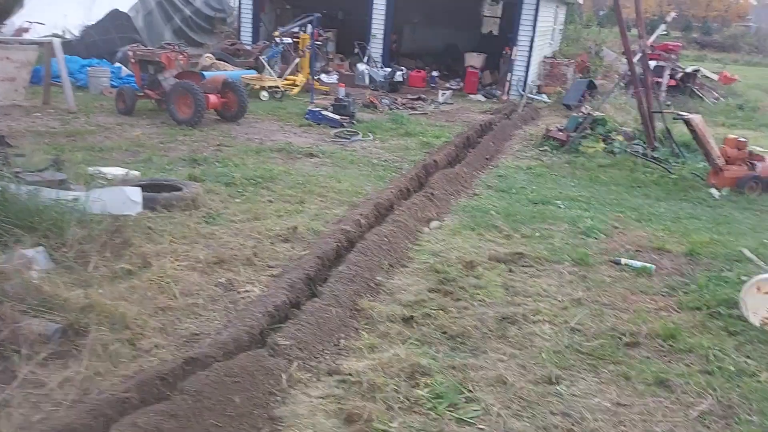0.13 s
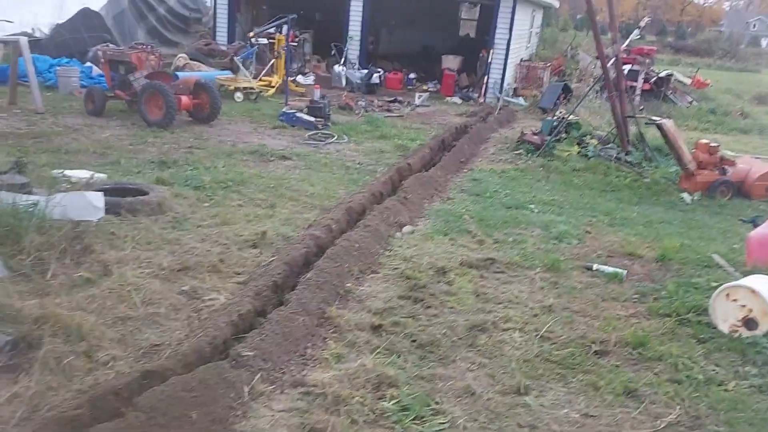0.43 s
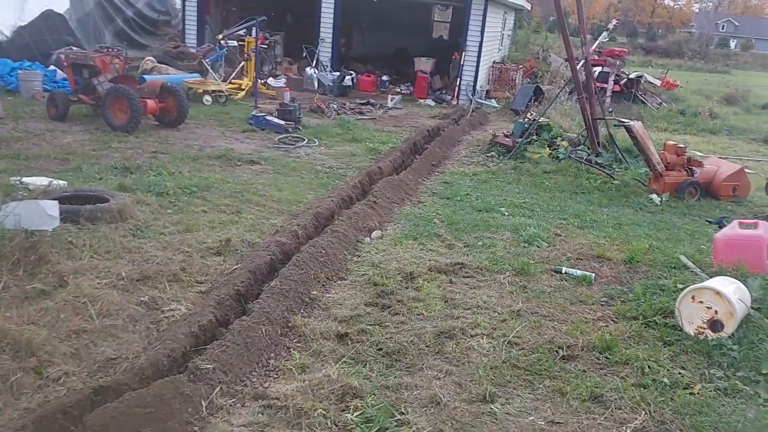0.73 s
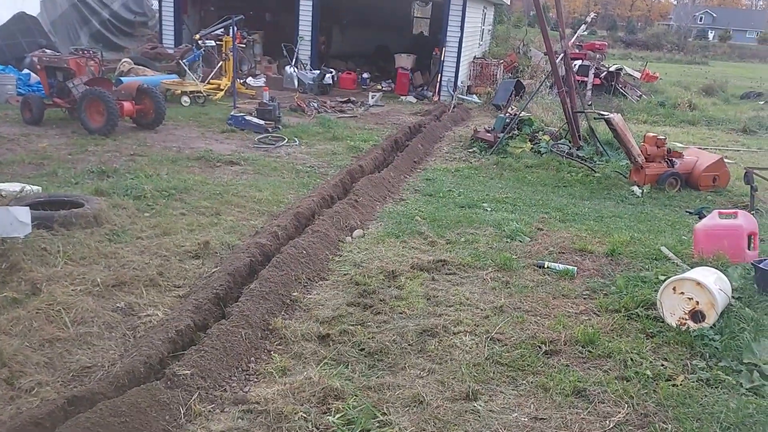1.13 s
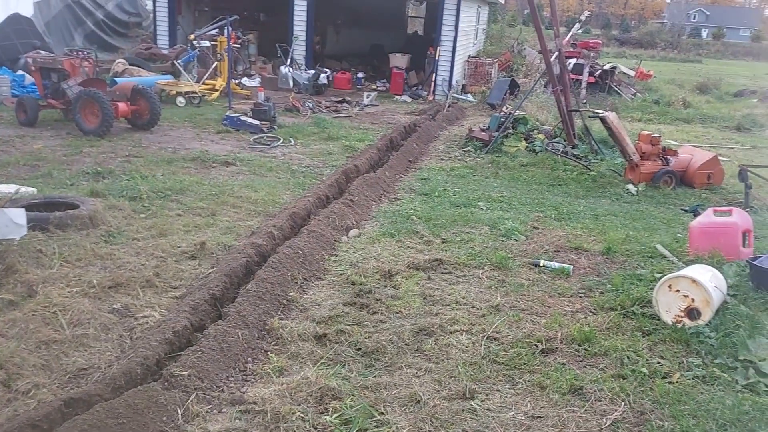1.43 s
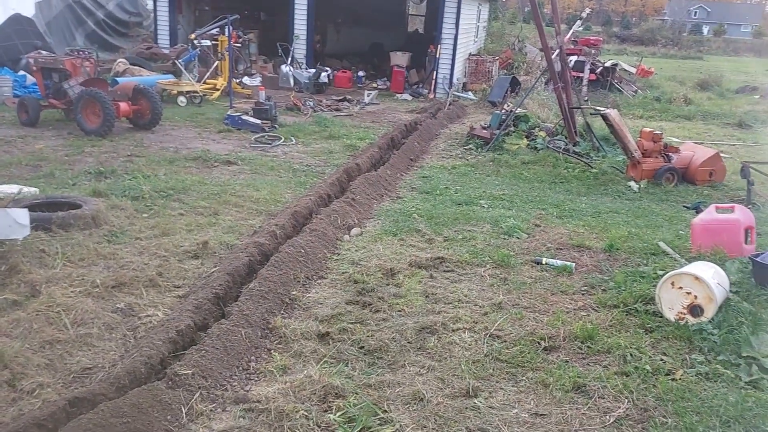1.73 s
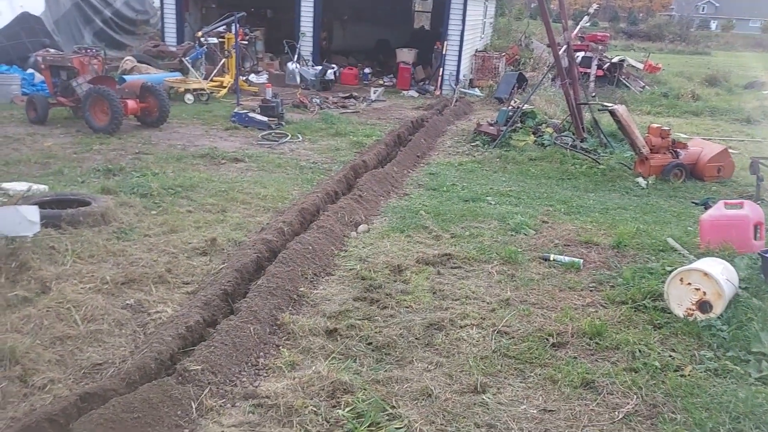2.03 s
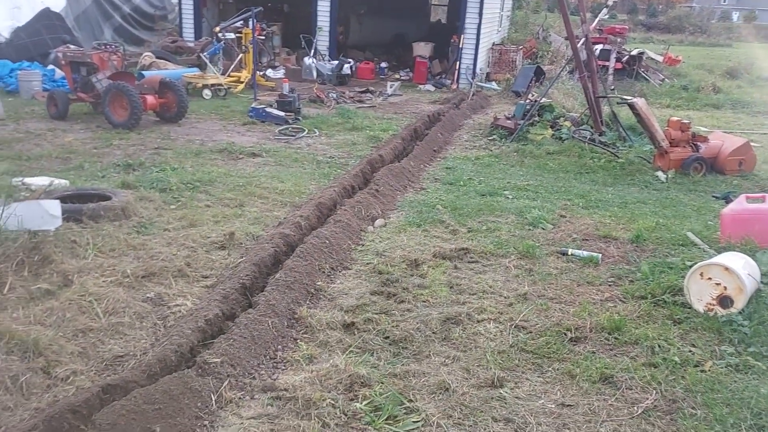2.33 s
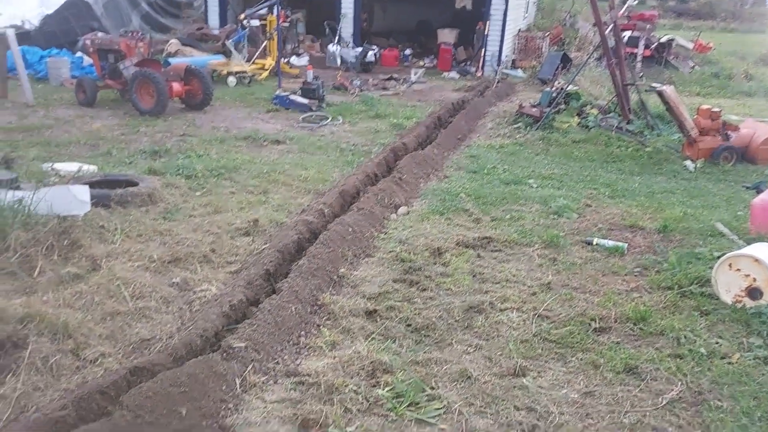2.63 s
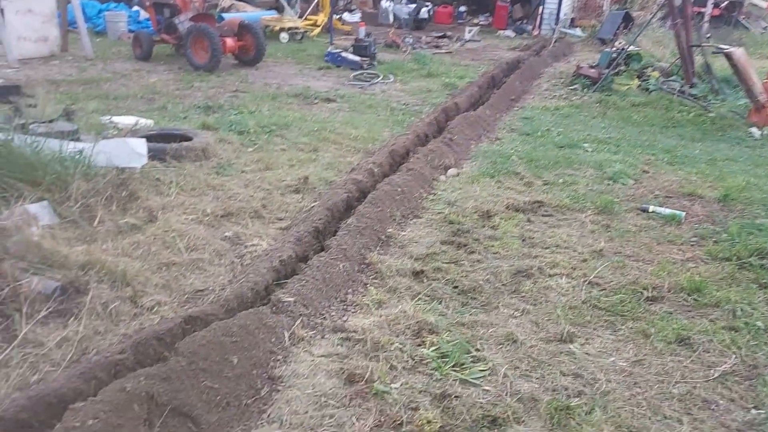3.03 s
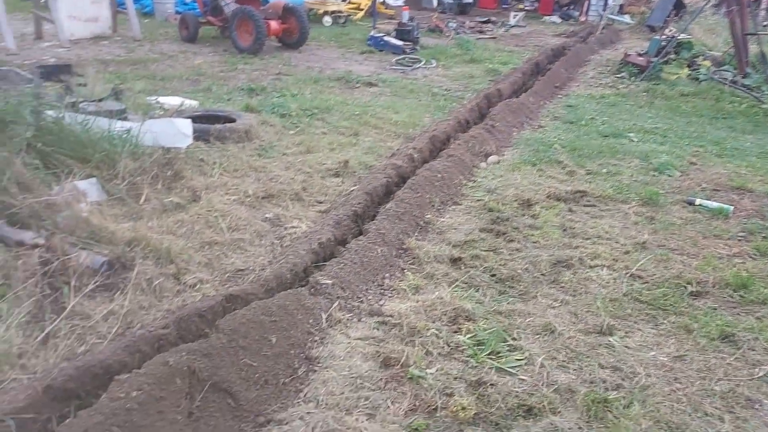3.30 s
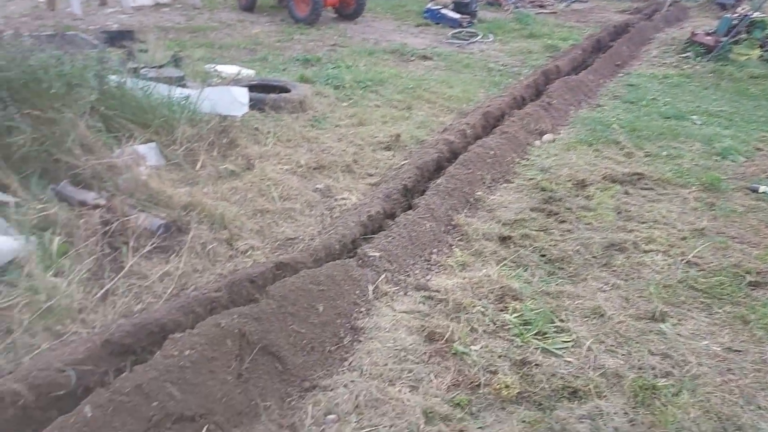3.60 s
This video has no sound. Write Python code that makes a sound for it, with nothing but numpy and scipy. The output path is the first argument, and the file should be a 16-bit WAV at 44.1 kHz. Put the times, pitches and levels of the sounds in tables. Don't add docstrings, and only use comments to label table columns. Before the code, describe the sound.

Small four-stroke engine chugs at constant speed to the left outdoors, a fainter low engine throbbing behind.

```python
import sys
import numpy as np
from scipy import signal
from scipy.fft import rfft, irfft
from scipy.io import wavfile

SR = 44100
rng = np.random.default_rng(int(sys.argv[2]) if len(sys.argv) > 2 else 0)


def inscribe(sig):
    pcm = np.round(np.clip(np.atleast_2d(sig).T, -1, 1) * 32767)
    wavfile.write(sys.argv[1], SR, pcm.astype(np.int16))


def voltage_ratio(level):
    return 10 ** (np.asarray(level, float) / 20)


N = 165816


def rms_one(x):
    return x / np.sqrt(np.mean(x ** 2) + 1e-20)


def in_time(rows):
    t_s, *columns = np.transpose(rows)
    return [np.interp(np.arange(N) / SR, t_s, column) for column in columns]


def at_hz(points):
    grid_hz = np.maximum(np.arange(N // 2 + 1) * SR / N, 1)
    f_hz, value = np.array(points).T
    return np.interp(np.log(grid_hz), np.log(f_hz), value)


def drift(rate_hz):
    r = np.exp(-80 * np.pi * rate_hz / SR)
    noise = rng.standard_normal(N // 40 + 2002)
    slow = signal.lfilter([1], [1, -2 * r, r * r], noise)[2000:]
    return np.interp(np.arange(N) / 40, np.arange(len(slow)), rms_one(slow))


def chance_db(spread_db, shape):
    return spread_db * np.clip(rng.standard_normal(shape), -1.8, 1.8)


def clicks_at(t_s, size):
    out = np.zeros(N)
    i = np.round(np.ravel(t_s) * SR).astype(int)
    keep = (i >= 0) & (i < N)
    np.add.at(out, i[keep], np.ravel(size)[keep])
    return out


def ring(drive, f_hz, t60_s):
    r = voltage_ratio(-60 / (t60_s * SR))
    w = 2 * np.pi * f_hz / SR
    return signal.lfilter([0, np.sin(w)], [1, -2 * r * np.cos(w), r * r], drive + 1e-18)


def high_pass(x, order, f_hz):
    return signal.sosfilt(signal.butter(order, f_hz, "high", fs=SR, output="sos"), x)


# t/s, firings counted
CRANK_POSITION = [(-0.039, -3.0), (0.4498, 11.5), (0.7364, 20.0), (1.0234, 28.5), (1.3084, 37.0),
                  (1.5946, 45.5), (1.8815, 54.0), (2.1675, 62.5), (2.4536, 71.0), (2.7394, 79.5),
                  (3.0254, 88.0), (3.3114, 96.5), (3.9335, 115.0)]


def firings():
    t_s, count = np.transpose(CRANK_POSITION)
    return np.interp(np.arange(count[0], count[-1]), count, t_s)


# f/Hz, level/dB, t60/s
SILENCER_MODES = [(61, -38.7, .028), (140, -46.7, .021), (177, -69, .12), (300, -37.6, .015),
                  (370, -60, .077), (478, -57.6, .042)]
# f/Hz, level/dB, t60/s
TAILPIPE_MODES = [(123.8, -61.5, .12), (286.6, -60, 0.063), (370, -72, 0.076), (447, -65.5, 0.086)]


def exhaust(fire):
    puff_db, vary_db, puff_ms = 60.5, 0.3, 0.41
    puff_lead_ms, pipe_lead_ms = 5.56, 1.19
    puff_low_hz, outlet_hz = 62, 45
    size = -voltage_ratio(vary_db * rng.standard_normal(len(fire)))
    clicks = clicks_at(fire - puff_lead_ms / 1000, size)
    early = clicks_at(fire - (puff_lead_ms + pipe_lead_ms) / 1000, -size)

    r = np.exp(-1000 / (puff_ms * SR))
    puff = signal.lfilter([(1 - r) ** 3], np.poly([r, r, r]), clicks)
    sound = high_pass(puff, 2, puff_low_hz)
    for k, (f_hz, db, t60_s) in enumerate(SILENCER_MODES):
        sound = sound + (-1) ** k * voltage_ratio(db) * ring(clicks, f_hz, t60_s)
    for f_hz, db, t60_s in TAILPIPE_MODES:
        sound = sound + voltage_ratio(db) * ring(early, f_hz, t60_s)
    return voltage_ratio(puff_db) * high_pass(sound, 4, outlet_hz)


# t/ms after puff rebound, knock level/dB, tick level/dB, hiss swell level/dB
CONTACT_EVENTS = [
    (-6.5, -8.5, -10, -7.5),
    (-1.5, 0, -0.5, 7.5),
    (-1.5, -12.5, -13.5, -11),
    (3, -3.5, -3.5, -5.5),
    (5, -12, 1, 2.5),
    (7.5, -9, -3.5, -14),
    (12.5, -4, -10.5, 6),
    (14.5, -11.5, -6.5, 1),
    (16.5, -18, -9, -3.5),
    (21, -8, -7, -4),
]


def struck(fire, strength_db, modes, vary_db):
    t_ms, jitter_ms = np.array(CONTACT_EVENTS)[:, 0], 0.044
    shape = (len(fire), len(t_ms))
    t_s = fire[:, None] + (t_ms + jitter_ms * rng.standard_normal(shape)) / 1000
    shared_db = chance_db(vary_db, shape)
    sound = np.zeros(N)
    for k, (f_hz, db, t60_s) in enumerate(modes):
        size = voltage_ratio(strength_db + db + shared_db + chance_db(vary_db, shape))
        sound += (-1) ** k * ring(clicks_at(t_s, size), f_hz, t60_s)
    return sound


# f/Hz, level/dB, t60/s
BLOCK_MODES = [(535, -9, .05), (652, -6, .04), (776, -3, .05), (1030, -9, .025), (1190, -4, .05),
               (1310, -6, .03), (1670, -4, .025), (2150, -3, .025), (2520, -7, .015)]


def knocks(fire):
    return struck(fire, -3 + np.array(CONTACT_EVENTS)[:, 1], BLOCK_MODES, vary_db=2)


# f/Hz, level/dB, t60/s
COVER_MODES = [(4230, -2, 0.013), (5130, -6, 0.013), (6700, -4, 0.014), (9400, -4, .012), (10170, 2, 0.014),
               (12000, 5, 0.015), (12700, 0, 0.014)]


def ticks(fire):
    return struck(fire, -13 + np.array(CONTACT_EVENTS)[:, 2], COVER_MODES, vary_db=2.2)


# f/Hz, share/0-1
PORT_SCATTER = [(30, 0.3), (100, 0.27), (300, 0.06), (700, .08), (1200, 0.47), (2500, 0.38), (5000, 0.81),
                (10000, 1)]


def two_ports(spectrum):
    same, left, right = rfft(rng.standard_normal((3, N)))
    apart = np.clip(at_hz(PORT_SCATTER), 0, 1)
    mixed = np.sqrt(1 - apart) * same + np.sqrt(apart) * np.array([left, right])
    return rms_one(irfft(voltage_ratio(at_hz(spectrum)) * mixed, N))


# f/Hz, level/dB per Hz
HISS_SPECTRUM = [(400, -5), (800, 0), (1400, -7.5), (2200, -2), (3300, -7), (4300, -6.5), (7000, -10),
                 (15000, -14.5)]


def hiss(fire):
    hiss_db, patchy_db = -2, 0.81
    swell_db, swell_vary_db, decay_ms = -3.5, 2.5, 3.4
    t_ms, db = np.array(CONTACT_EVENTS)[:, [0, 3]].T
    size = voltage_ratio(swell_db + db + chance_db(swell_vary_db, (len(fire), len(t_ms))))
    clicks = clicks_at(fire[:, None] + t_ms / 1000, size)
    swell = signal.lfilter([1], [1, -np.exp(-1000 / (decay_ms * SR))], clicks)
    level = voltage_ratio(hiss_db + patchy_db * (drift(1.4) + drift(13.3)))
    return level * (1 + swell) / 2 * two_ports(HISS_SPECTRUM)


# t/s, level/dB
NEAR_LEVEL = [
    (0.1, -19.5),
    (0.86, -21.5),
    (1.7, -19),
    (3.64, -19.5),
    (3.65, -24),
    (3.66, -19),
    (3.68, -20),
    (3.7, -20),
]


def near_engine():
    fire = firings()
    level_db, = in_time(NEAR_LEVEL)
    return voltage_ratio(level_db) * (exhaust(fire) + knocks(fire) + ticks(fire) + hiss(fire))


# t/s, cycle rate f/Hz, level/dB
FAR_RUN = [
    (0.1, 17.2, -34),
    (0.54, 17.2, -38),
    (1.29, 17.1, -30),
    (1.51, 17.1, -34),
    (2.05, 17.7, -26),
    (2.41, 18.1, -30),
    (3.7, 18.0, -28),
]
# multiple of cycle rate, level/dB
FAR_ORDER_LEVELS = [(2, -54), (3, -26.5), (4, 3.5), (5, -13.5), (6, -5), (7, -3.5), (8, -30), (9, -34),
                    (10, -7)]


def far_engine():
    waver_db, waver_rad = 1.0, 0.3
    rate_hz, run_db = in_time(FAR_RUN)
    phase = 2 * np.pi * np.cumsum(rate_hz) / SR
    sound = np.zeros(N)
    for k, order_db in FAR_ORDER_LEVELS:
        level = np.sqrt(2) * voltage_ratio(run_db + order_db + waver_db * drift(2.14))
        sound += level * np.sin(k * phase + waver_rad * drift(2.0))
    return sound


# f/Hz, level/dB per Hz
RUMBLE_SPECTRUM = [(20, -8), (35, -6), (48, 1), (70, -3.5), (120, 0), (250, -8), (500, -11), (900, -28)]


def rumble():
    return voltage_ratio(-26) * two_ports(RUMBLE_SPECTRUM)


def trills(rows, f_hz, floor_db):
    width_hz, edge_s = 130, 0.003
    t = np.arange(N) / SR
    level = voltage_ratio(floor_db)
    for t_s, length_s, db in rows:
        inside_s = np.minimum(t - t_s, t_s + length_s - t)
        level = level + voltage_ratio(db) * np.clip(inside_s / edge_s + 0.5, 0, 1)
    t60_s = 1.3 / width_hz
    whistle = ring(ring(rng.standard_normal(N), f_hz, t60_s), f_hz, t60_s)
    return level * rms_one(whistle)


# start t/s, length t/s, level/dB
HIGH_TRILL_EVENTS = [(0.13, 0.048, -41), (0.221, 0.044, -43), (0.355, 0.036, -48), (0.441, 0.04, -42),
                     (0.507, 0.036, -43), (0.633, 0.056, -48), (0.69, 0.032, -44), (0.81, 0.031, -45),
                     (0.996, 0.026, -44), (1.101, 0.04, -46), (1.399, 0.031, -39), (1.814, 0.036, -49),
                     (1.988, 0.044, -48), (2.075, 0.042, -43), (2.127, 0.046, -45), (2.919, 0.072, -44),
                     (2.998, 0.062, -39), (3.093, 0.052, -44), (3.229, 0.034, -39), (3.362, 0.034, -46)]
# start t/s, length t/s, level/dB
LOW_TRILL_EVENTS = [
    (.238, .065, -37),
    (3.555, 0.07, -32),
]


def insects():
    high = voltage_ratio(4.0) * trills(HIGH_TRILL_EVENTS, 14905, floor_db=-54)
    return high + trills(LOW_TRILL_EVENTS, 10950, floor_db=-80)


def scene():
    return near_engine() + far_engine() + rumble() + insects()


# f/Hz, level/dB
LEFT_RESPONSE = [(30, -14), (55, -4), (180, 0.5), (500, 0.5), (800, 1), (1020, -8), (1300, 4), (1700, -2.5)]
RIGHT_RESPONSE = [(30, -8), (55, -0.5), (180, -1), (500, -1.5), (800, 2.5), (1050, 4.5), (1400, 2),
                  (1700, 4)]
# f/Hz, level/dB
LEFT_TREBLE_RESPONSE = [(1700, 0), (3300, 2), (5000, 2), (7200, 0), (7600, -5), (8800, -1), (10500, 1.5),
                        (14500, 0.5)]
RIGHT_TREBLE_RESPONSE = [(1700, 0), (3300, -1), (5000, 2), (6900, 1), (7550, -11), (9300, -13),
                         (11200, -16.5), (14500, -14.5)]
# f/Hz, phase/rad
LEFT_BASS_LEAD = [(30, 1), (60, 0.85), (130, 0.49), (260, 0.18), (500, -0.37), (900, -0.072)]


def microphone(x):
    right_lag_ms, edge_hz, edge_db_per_hz = 0.47, 15720, 0.2
    f_hz = np.arange(N // 2 + 1) * SR / N
    lag_rad = at_hz(LEFT_BASS_LEAD) + 2 * np.pi * f_hz * right_lag_ms / 1000
    left_db = at_hz(LEFT_RESPONSE) + at_hz(LEFT_TREBLE_RESPONSE)
    right_db = at_hz(RIGHT_RESPONSE) + at_hz(RIGHT_TREBLE_RESPONSE)
    edge_db = edge_db_per_hz * np.maximum(f_hz - edge_hz, 0)
    gain = voltage_ratio(np.array([left_db, right_db]) - edge_db)
    return irfft(rfft(x) * gain * np.exp(-1j * np.outer([0, 1], lag_rad)), N)


def low_pass(x):
    return signal.sosfilt(signal.butter(12, 16240, fs=SR, output="sos"), x)


def record(dry):
    peak_top, start_s, fade_s = 1.1, 0.0697, 0.00039
    wet = microphone(peak_top * np.tanh(dry / peak_top))
    fade_in = np.clip((np.arange(N) / SR - start_s) / fade_s, 0, 1)
    return low_pass(wet * fade_in)


dry = scene()
out = record(dry)
inscribe(out)
```